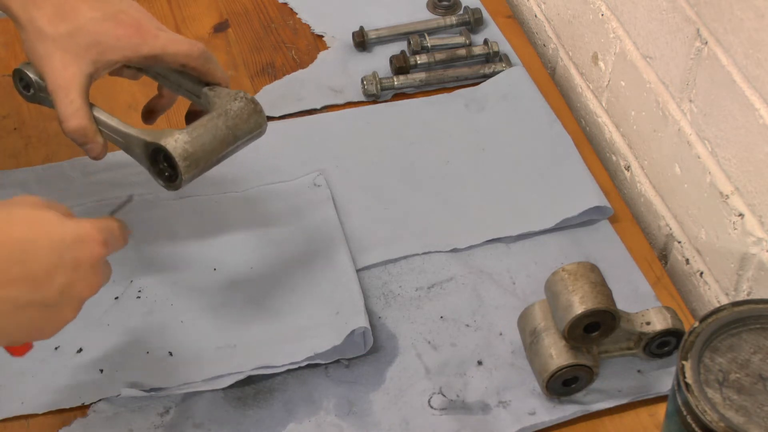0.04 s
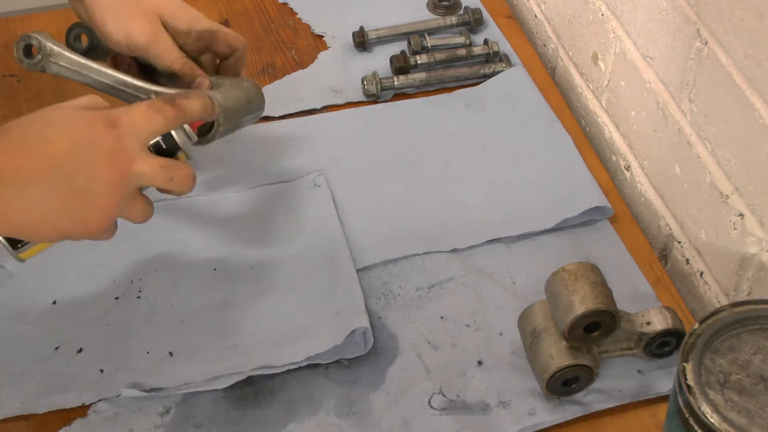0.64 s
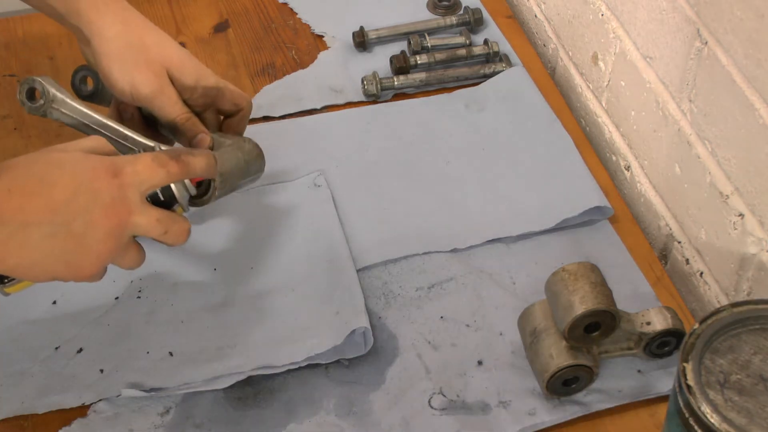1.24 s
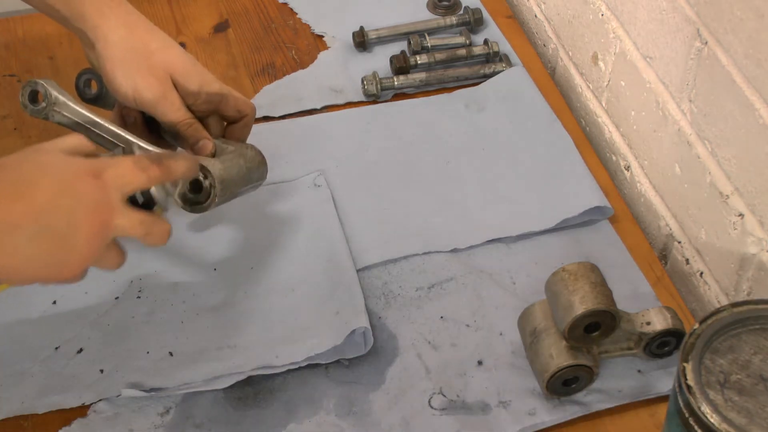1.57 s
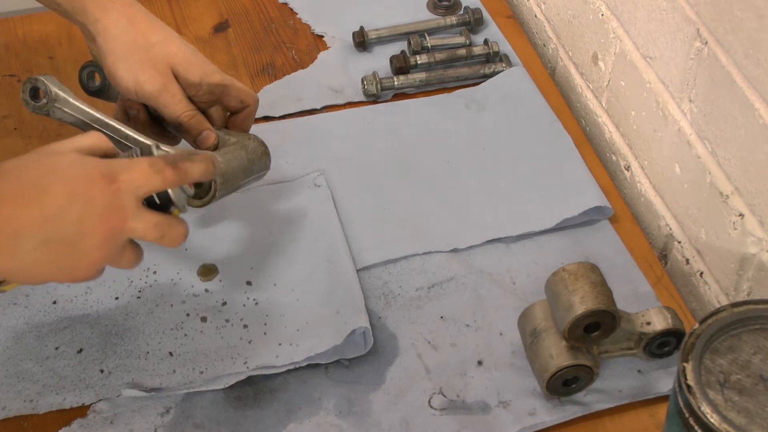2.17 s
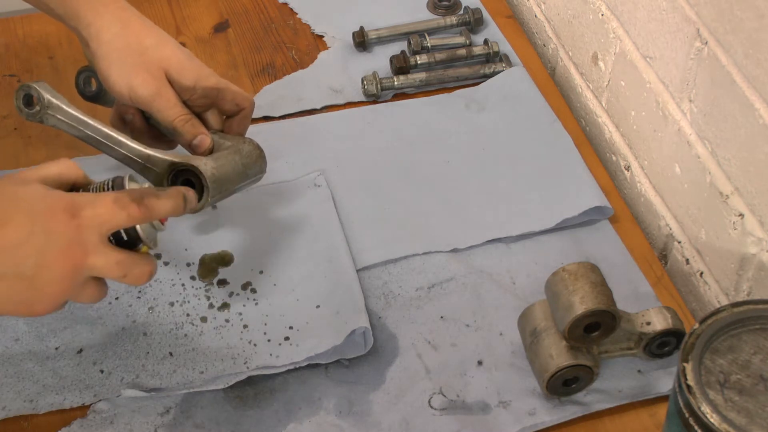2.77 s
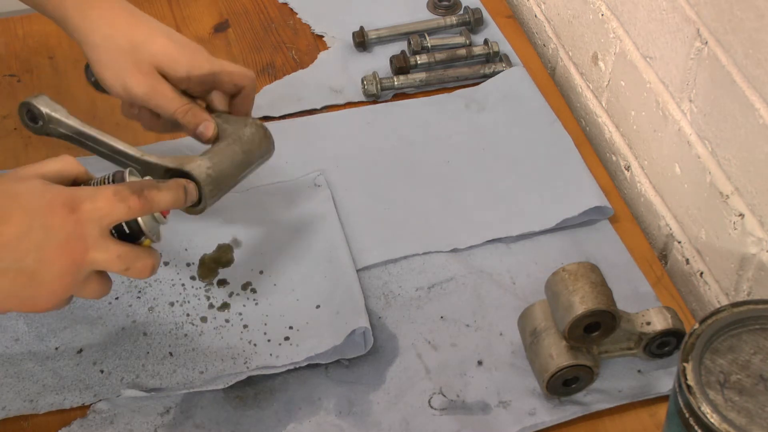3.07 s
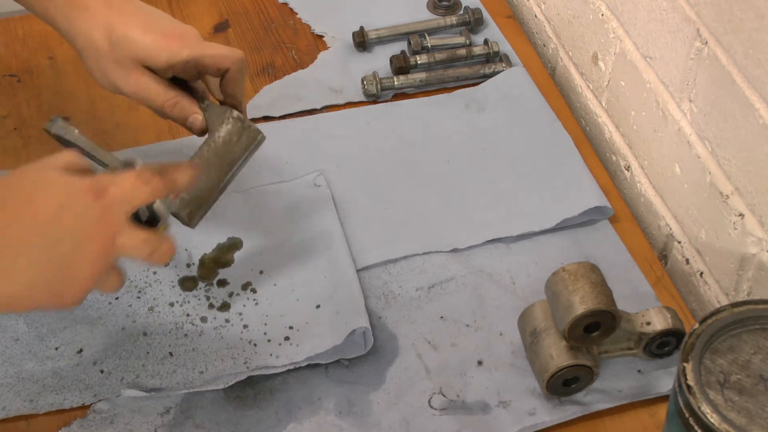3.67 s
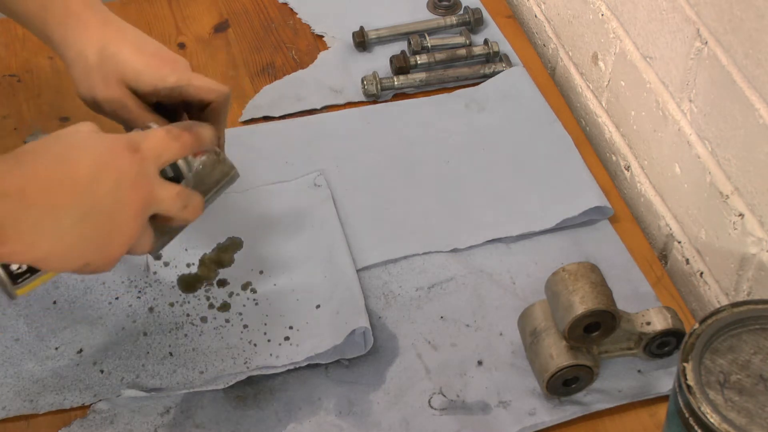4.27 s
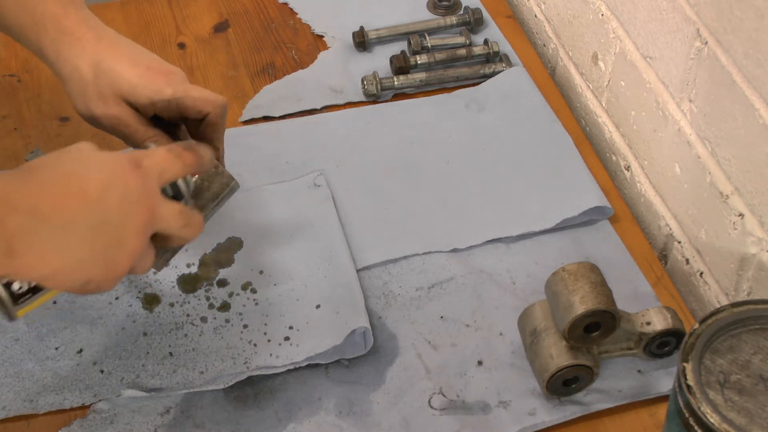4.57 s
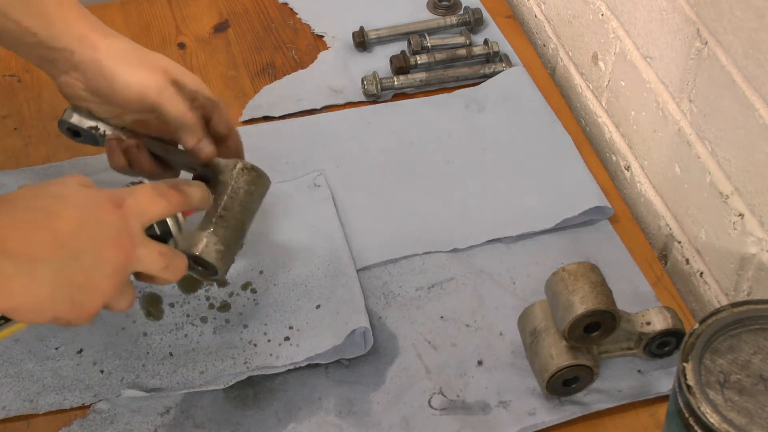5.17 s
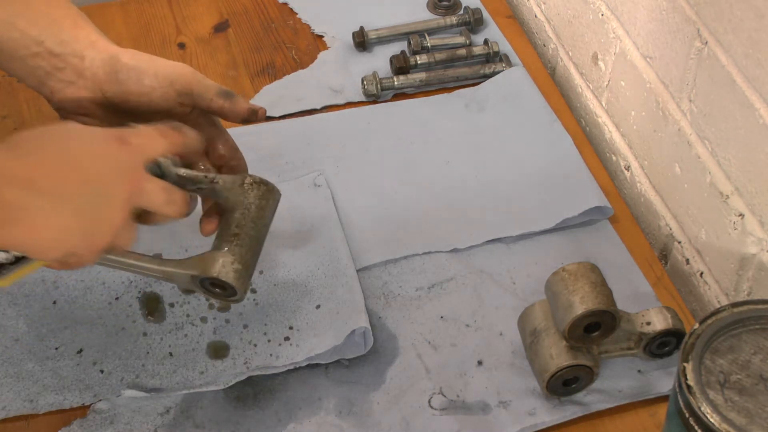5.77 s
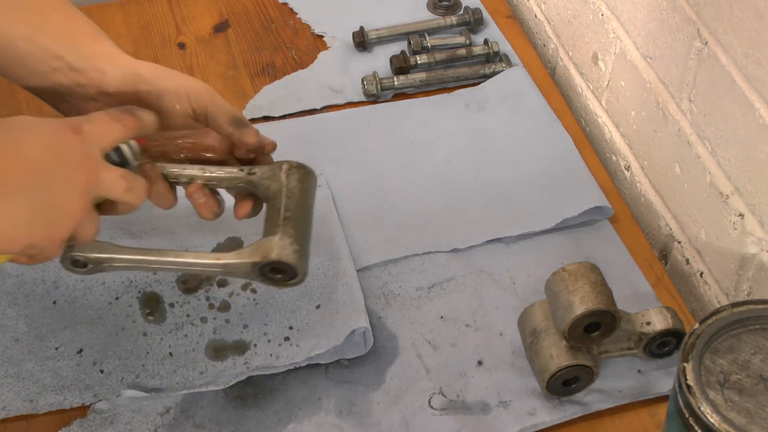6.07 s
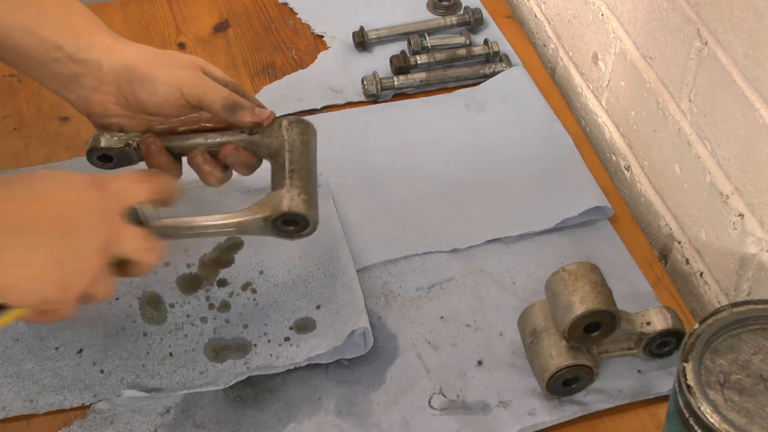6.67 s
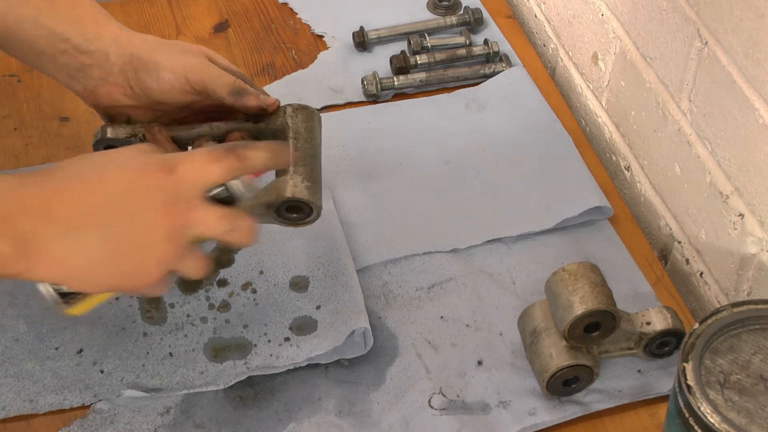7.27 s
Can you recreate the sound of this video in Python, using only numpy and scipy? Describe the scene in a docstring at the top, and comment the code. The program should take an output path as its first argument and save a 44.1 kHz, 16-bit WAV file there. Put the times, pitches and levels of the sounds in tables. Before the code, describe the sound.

An aerosol can sprays a metal part in four longer hissing bursts, then three quick puffs, over a low workshop hum.

```python
"""A light tick on metal comes first, over a workshop's fan and low hum; fingers rub an aluminium linkage.
Aerosol degreaser then hits the part, over a paper-covered bench, in four long and three short bursts.
In each the valve cracks open with a thin whistle and a wet trickle; then the turbulent jet hisses,
spatters on the metal and excites the cavity resonances of the bore and the cupped hand.
The solvent bubbles away after every burst, and the room answers with a short reverberation."""
import sys
import numpy as np
from scipy import signal
from scipy.fft import rfft, irfft, next_fast_len
from scipy.io import wavfile
from scipy.ndimage import map_coordinates

SR = 44100
rng = np.random.default_rng(int(sys.argv[2]) if len(sys.argv) > 2 else 0)


def transcribe(u):
    """Save the signal u as a 16-bit wav file named by the first command-line argument.

    u: samples, shape (n,) or (channels, n), limited to [-1, 1]; the rate is SR.
    q: integer samples, one column per channel.
    """
    v = np.clip(np.atleast_2d(u).T, -1, 1)
    q = np.round(v * 32767).astype(np.int16)
    wavfile.write(sys.argv[1], SR, q)


N = 327663


def amp(db):
    """Amplitude ratio of a level in decibels."""
    return 10 ** (np.asarray(db) / 20)


def unit(x):
    """Normalisation to rms 1."""
    return x / np.sqrt(np.mean(x ** 2) + 1e-20)


def along(points, hz):
    """Interpolation of (f, value) points on a logarithmic frequency axis."""
    f, v = np.transpose(points)
    return np.interp(np.log(hz + 1), np.log(f), v)


def wobble(rate, size):
    """Slow random modulation: a spline through rate knots a second."""
    knots = rng.standard_normal(int(size * rate / SR) + 4)
    return map_coordinates(knots, [np.arange(size) * rate / SR])


def filtered(x, response):
    """Linear filtering: the spectrum of x times a frequency response."""
    n = x.shape[-1]
    m = next_fast_len(n + 8192)
    return irfft(rfft(x, m) * response(np.fft.rfftfreq(m, 1 / SR)), m)[..., :n]


def noise(response, size):
    """Spectrally shaped Gaussian noise of rms 1."""
    return unit(filtered(rng.standard_normal(size), response))


def peak(f, hz, half_width):
    """Lorentzian resonance curve."""
    return 1 / (1 + ((f - hz) / half_width) ** 2)


def add(track, s, sound):
    """Superposition of a sound on the track from time s."""
    part = track[max(round(s * SR), 0):][:len(sound)]
    part += sound[:len(part)]


def tone(hz, waver_db, drift_rad):
    """A sinusoid under random amplitude and phase modulation."""
    t = np.arange(N) / SR
    return amp(waver_db * wobble(8.1, N)) * unit(np.sin(2 * np.pi * hz * t + drift_rad * wobble(6, N)))


# Touches of pick and fingers: t/s, level/dB, centre f/Hz, bandwidth/Hz, T60/s
TOUCHES = [(0, -51, 5240, 5000, 0.15), (0, -55.5, 2190, 700, 0.1), (.553, -59.5, 5500, 6000, 0.12),
           (3.027, -63, 8050, 1800, 0.055), (3.056, -73, 3900, 2960, .06), (7.225, -68, 2360, 400, 0.097),
           (7.251, -49.5, 2520, 506, 0.056), (7.361, -56.5, 6500, 5000, 0.13),
           (7.389, -55, 2150, 700, 0.049), (7.39, -60.5, 6500, 5000, 0.073)]
def ticks():
    """Impact excitation: the metal's vibration decays exponentially, damped by the hand."""
    out, t = np.zeros(N), np.arange(SR // 4) / SR
    attack = 1 - np.exp(-t / 0.0022)
    for s, db, hz, width, t60 in TOUCHES:
        add(out, s, amp(db - 60 * t / t60) * attack * noise(lambda f: peak(f, hz, width / 2), len(t)))
    return out


# Spectra of the room's rumble and hiss: f/Hz, relative level/dB
RUMBLE_SPECTRUM = [(25, -29), (45, -8.5), (60, -1.5), (85, 2), (150, 1), (200, -2), (232, -4.5), (290, -5),
                   (380, -13.5), (500, -10.5), (640, -17), (800, -15.5), (920, -21.5), (1250, -24.5),
                   (1800, -33.5)]
HISS_SPECTRUM = [(600, -9.5), (1000, -12), (1350, -5), (1550, 0), (1800, 2.5), (2600, 1.5), (5000, -1),
                 (8000, -5.5), (15800, -36)]
def room_noise(rumble_db=-59, hiss_db=-70):
    """Partial coherence: each ear receives a common noise plus one of its own."""
    def pair(spectrum):
        shape = lambda f: amp(along(spectrum, f))
        return unit(noise(shape, N) + noise(shape, (2, N)))
    return amp(rumble_db) * pair(RUMBLE_SPECTRUM) + amp(hiss_db) * pair(HISS_SPECTRUM)


# Air resonances of the fan housing: f/Hz, bandwidth/Hz, level/dB
HOUSING_MODES = [(435, 12, -82), (527, 110, -77.5), (856, 15, -104), (1408, 28, -81.5), (1753, 140, -80.5)]
# Blade tone and its octave: f/Hz, level/dB
BLADE_TONES = [(420.5, -76.5), (844.5, -74)]
def fan():
    """Periodic blade passage gives tones; broadband flow noise excites the housing's resonances."""
    housing = lambda f: sum(amp(db) * unit(peak(f, hz, width / 2)) for hz, width, db in HOUSING_MODES)
    airflow = filtered(rng.standard_normal(N), housing)
    return airflow + sum(amp(db) * tone(hz, waver_db=0.8, drift_rad=0.75) for hz, db in BLADE_TONES)


# Envelope of the low hum: t/s, level/dB
HUM_ENVELOPE = [(0.0, -71), (0.29, -74), (3.62, -79), (4.32, -63.5), (5.98, -65), (6.21, -53.5),
                (6.66, -64), (7.33, -56.5), (7.43, -71)]
def hum(hz=75.0):
    """Harmonic pair: a wavering fundamental and its weaker octave share one envelope."""
    envelope = amp(np.interp(np.arange(N) / SR, *np.transpose(HUM_ENVELOPE)))
    fundamental = tone(hz, waver_db=4.0, drift_rad=0.49)
    octave = amp(-12.5) * tone(2 * hz, waver_db=2.5, drift_rad=4.3)
    return envelope * (fundamental + octave)


def drone(hz=272, rest_db=-72.5, swell_db=12.5, crest_s=2.76, rise_s=0.16, fall_s=.8):
    """Narrow-band noise is heard as a soft pitch; it swells once."""
    swell = np.interp(np.arange(N) / SR, [crest_s - rise_s, crest_s, crest_s + fall_s], [0, 1, 0])
    return amp(rest_db + swell_db * swell) * noise(lambda f: peak(f, hz, 22), N)


# Reverberation time of the workshop: f/Hz, T60/s
DECAY_TIMES = [(200, 0.42), (2000, 0.32), (5000, 0.25), (9000, 0.2), (15000, 0.083)]
def workshop(x, direct_db=2.0, wet_db=-4.5, size=16384):
    """Reverberation by convolution; a fresh diffuse tail per block stands for the moving can and hands."""
    wet, window = np.zeros((2, N)), signal.windows.hann(size, sym=False)
    padded = np.pad(x, (size // 2, size))
    for i in range(0, N + size // 2, size // 2):
        hz, t, diffuse = signal.stft(rng.standard_normal((2, SR // 3)), SR, nperseg=256)
        decay = amp(-60 * t / along(DECAY_TIMES, hz)[:, None])
        tail = signal.istft(diffuse * decay, SR, nperseg=256)[1]
        block = padded[i:i + size] * window
        answer = signal.fftconvolve(block[None], tail / np.linalg.norm(tail[0]), axes=1)
        for ear in range(2):
            add(wet[ear], (i - size // 2) / SR + .004, answer[ear, max(size // 2 - i, 0):])
    return amp(direct_db) * x + amp(wet_db) * wet


# Slow slides of the fingers: t/s, duration/s, level/dB, bright resonance re dull/dB
SLIDES = [(.55, 0.78, -80, -12), (3.661, 0.58, -72, -5)]
def rubbing(dull_hz=1850, bright_hz=4520, width_hz=490):
    """Friction noise: skin sliding on the metal faintly excites two resonances of its bore."""
    out = np.zeros(N)
    for s, length, db, bright_db in SLIDES:
        n = int(length * SR)
        bore = lambda f: peak(f, dull_hz, width_hz / 2) + amp(bright_db) * peak(f, bright_hz, width_hz / 2)
        add(out, s, amp(db) * signal.windows.tukey(n, .4) * noise(bore, n))
    return out


def whistle(length, hz, width, db, bend=0, taper=.6, settle_s=0.026):
    """A breathy flow tone: narrow-band noise on a carrier that may start sharp and settle."""
    t = np.arange(int(length * SR)) / SR
    phase = 2 * np.pi * np.cumsum(hz * (1 + bend * np.exp(-t / settle_s))) / SR
    a, b = noise(lambda f: peak(f, 0, width / 2), (2, len(t)))
    return amp(db) * signal.windows.tukey(len(t), taper) * unit(a * np.sin(phase) + b * np.cos(phase))


def droplets(response, size, clump_db):
    """Intermittent turbulence: shaped noise whose strength jumps from droplet to droplet."""
    return unit(filtered(rng.standard_normal(size) * amp(clump_db * wobble(2500, size)), response))


# Resonances of the bore and the cupped hand: f/Hz, half-width/Hz, relative level/dB
CAVITY_MODES = [(1796, 130, -10), (1843, 150, -6.5), (2224, 235, -2), (2464, 180, -1), (2800, 180, -6.5)]
def cavity_resonance(n, wander_db=1.8):
    """Noise-driven air resonances trade strength as the jet moves."""
    out = np.zeros(n)
    for hz, half_width, db in CAVITY_MODES:
        strength = amp(db + wander_db * wobble(12.75, n))
        out += strength * filtered(rng.standard_normal(n), lambda f: peak(f, hz, half_width))
    return unit(out)


def near_echoes(x, strength, sway_s=.00007, count=6):
    """Comb filtering by reflections from bench, wall and part; the delays drift as the hands move."""
    i, out = np.arange(len(x)), x.copy()
    for delay in np.geomspace(.0007, .006, count) * np.exp(0.147 * rng.standard_normal(count)):
        lag = SR * (delay + sway_s * wobble(4.3, len(x)))
        out += strength * np.interp(i - lag, i, x, left=0)
    return out / np.sqrt(1 + count * strength ** 2)


# Spectrum of drops landing on the part: f/Hz, relative level/dB
SPATTER_SPECTRUM = [(120, -24.5), (230, -8.5), (310, -1.5), (400, -10.5), (510, 2), (640, -1.5), (800, -8),
                    (1000, -7.5), (1200, -6), (1600, -3), (2200, -20.5)]
def nozzle_flow(start, stop, level, mix_db, spectrum, open_s, shut_s, gain_db, sputter_db, echo,
                fizz_hz=8200, body_hz=2900, flutter_db=0.96, usual_flow_db=-33):
    """Atomisation: a harder flow has a larger share of fine mist, and less of spatter and cavity tone."""
    t = np.arange(start - .08, stop + .09, 1 / SR)
    n = len(t)
    flow_db = np.interp(t, *np.transpose(level))
    excess_db = flow_db - usual_flow_db
    fizz_db, spatter_db, cavity_db = mix_db
    shape = lambda f: amp(along(spectrum, f))
    fine = lambda f: 1 / (1 + (fizz_hz / (f + 1)) ** 10)
    coarse = lambda f: (1 - fine(f)) / (1 + (body_hz / (f + 1)) ** 6)
    jet = amp(-2.5) * droplets(lambda f: shape(f) * np.sqrt(coarse(f)), n, clump_db=2.0)
    fizz = droplets(lambda f: shape(f) * np.sqrt(fine(f)), n, clump_db=1.5)
    fizz *= amp(fizz_db + 0.42 * excess_db + sputter_db * wobble(31.2, n))
    spatter = droplets(lambda f: amp(along(SPATTER_SPECTRUM, f)) * peak(f, 0, 5000), n, clump_db=1.5)
    spatter *= amp(spatter_db - 0.54 * excess_db)
    cavity = cavity_resonance(n) * amp(cavity_db - 0.26 * excess_db - 2.0)
    cavity /= 1 + np.exp((start - t) / 0.018)  # the bore takes time to fill
    valve = np.exp(-np.maximum(start - t, 0) / open_s - np.maximum(t - stop, 0) / shut_s)
    flow = valve * amp(flow_db + gain_db + flutter_db * wobble(70.3, n))
    return t[0], near_echoes(flow * (jet + fizz + spatter + cavity), strength=echo)


# Spectra of the half-open valve's wet stream and of the full jet: f/Hz, relative level/dB
TRICKLE_SPECTRUM = [(1200, -17.5), (1800, 7), (2500, 5.5), (3150, -2), (3900, 1), (4250, 1.5), (4650, 2),
                    (5300, 1.5), (5900, -0.5), (7100, -3.5), (8600, -9), (10000, -8.5), (11800, -14),
                    (12500, -18.5), (15800, -28.5)]
JET_SPECTRUM = [(760, -38), (1300, -5), (1540, -22.5), (1850, -4.5), (2060, -10), (2460, 1), (3000, -5),
                (3400, -0.5), (3980, -2.5), (4560, -0.5), (7840, -3.5), (8710, -5.5), (9470, -5),
                (13900, -16), (15800, -24.5)]
def press(crack, trickle, full, shut, level, mix_db, whistle_hz, whistle_db, width_hz, bend=0):
    """Flow through a widening orifice: a two-tone whistle, a sputtering trickle, then the full jet."""
    out = np.zeros(N)
    for ratio, db in (1, 0), (1.33, -9.5):
        add(out, crack, whistle(0.079, ratio * whistle_hz, width_hz, whistle_db + db, bend, taper=.5))
    trickle_mix_db = np.add(mix_db, (0.5, -2, -2))  # fizz, spatter, cavity
    add(out, *nozzle_flow(trickle, full - .006, level, trickle_mix_db, TRICKLE_SPECTRUM,
                          open_s=0.0148, shut_s=0.0036, gain_db=-0.8, sputter_db=2, echo=0.27))
    add(out, *nozzle_flow(full, shut, level, mix_db, JET_SPECTRUM,
                          open_s=0.0048, shut_s=0.014, gain_db=-0.7, sputter_db=1.46, echo=0.21))
    return out


# Long presses: crack t/s, trickle t/s, fully open t/s, shut t/s, whistle f/Hz, whistle level/dB,
# fraction by which the whistle starts sharp, relative level/dB of fizz, of spatter and of cavity
LONG_PRESSES = [(1.142, 1.189, 1.449, 1.767, 6000, -58, .4, -3.5, -21.5, -6.5),
                (2.056, 2.083, 2.134, 2.56, 6140, -50.5, 0, -3, -18, -5.5),
                (4.089, 4.16, 4.397, 4.901, 5820, -55.5, 0.02, -4.5, -19.5, -7.5),
                (5.301, 5.364, 5.55, 5.855, 5500, -57.5, 0.049, -5, -17.5, -6)]
# Flow under the finger, one curve per long press: t/s, level/dB
FLOW_CURVES = [
    [(1.19, -44), (1.254, -35.5), (1.364, -46), (1.494, -33.5), (1.512, -27), (1.64, -29), (1.654, -30),
     (1.74, -37.5)],
    [(2.085, -47), (2.111, -44.5), (2.159, -36), (2.273, -31), (2.307, -28), (2.379, -28.5), (2.431, -34.5),
     (2.467, -33), (2.477, -29.5), (2.557, -28.5), (2.565, -31)],
    [(4.16, -44), (4.372, -47.5), (4.402, -36.5), (4.574, -33.5), (4.9, -35.5)],
    [(5.362, -44.5), (5.41, -43.5), (5.42, -47.5), (5.538, -42), (5.55, -35.5), (5.598, -34), (5.646, -26),
     (5.694, -29), (5.724, -34.5), (5.742, -30), (5.855, -38.5)],
]
def long_bursts():
    """Throttling: the level of the jet noise follows the finger's pressure on the valve."""
    out = np.zeros(N)
    for (crack, trickle, full, shut, hz, db, bend, *mix_db), level in zip(LONG_PRESSES, FLOW_CURVES):
        out += press(crack, trickle, full, shut, level, mix_db, hz, db, width_hz=520, bend=bend)
    return out


# Hollow tones within the hiss, the nozzle's thin whistle in the first burst, and one brief low splash of the
# jet on the part: t/s, duration/s, f/Hz, # bandwidth/Hz, level/dB
HOLLOW_TONES = [(1.192, 0.3, 5820, 200, -51), (2.185, .039, 1870, 90, -39.5), (2.568, .046, 1920, 130, -51.5),
                (4.622, 0.078, 2400, 130, -41), (4.683, 0.18, 530, 90, -54), (5.44, 0.16, 4650, 500, -51),
                (5.58, .075, 520, 450, -50), (5.6, .14, 5540, 450, -35.5), (5.6, .07, 1704, 454, -40)]
def hollow_tones():
    """Edge and cavity tones sound as the jet crosses the part's edges and bore; the first row is the nozzle's
    own thin whistle, held through the first burst, and the one broad low row is the jet splashing straight onto
    the part."""
    out = np.zeros(N)
    for s, length, hz, width, db in HOLLOW_TONES:
        add(out, s, whistle(length, hz, width, db))
    return out


# Spectrum of solvent bubbling off the part: f/Hz, relative level/dB
BUBBLE_SPECTRUM = [(1500, -20.5), (3500, -2.5), (5500, 2.5), (8500, 0), (15800, -13.5)]
def foam(sprayed, relative_db=-32.5, life_s=.38):
    """Leaky integration: solvent gathers with every burst and bubbles away exponentially."""
    keep = np.exp(-1 / (life_s * SR))
    wetness = np.sqrt(signal.lfilter([1 - keep], [1, -keep], sprayed ** 2))
    envelope = wetness * amp(relative_db + wobble(25, N))
    return envelope * droplets(lambda f: amp(along(BUBBLE_SPECTRUM, f)), N, clump_db=3)


# Quick presses: crack t/s, fully open t/s, shut t/s, trickle level/dB, jet level/dB, relative fizz/dB
QUICK_PRESSES = [(6.064, 6.124, 6.187, -44, -31, -5), (6.484, 6.554, 6.643, -48.5, -33.5, -3.5),
                 (6.861, 6.908, 7.002, -50, -34.5, -5)]
def short_bursts(lag_s=.03, rise_s=0.012, arch_db=4, spatter_db=-17, cavity_db=-5):
    """Transient flow: each puff rises and falls in an arch, its whistle broader and so breathier."""
    out = np.zeros(N)
    for crack, full, shut, trickle_db, jet_db, fizz_db in QUICK_PRESSES:
        end_db, top_db = jet_db - arch_db / 2, jet_db + arch_db / 2
        level = [(full - rise_s, trickle_db), (full, end_db), ((full + shut) / 2, top_db), (shut, end_db)]
        out += press(crack, crack + lag_s, full, shut, level, (fizz_db, spatter_db, cavity_db),
                     whistle_hz=6100, whistle_db=-56.5, width_hz=1900)
    return out


def scene():
    """Superposition: handling and spray reverberate, over the bubbling solvent and the background."""
    sprayed = long_bursts() + hollow_tones() + short_bursts()
    background = room_noise() + fan() + hum() + drone()
    return workshop(ticks() + rubbing() + sprayed) + foam(sprayed) + background


# Stereo width of the microphone pair: f/Hz, side gain/dB
SIDE_GAIN = [(30, 5), (70, -17), (150, -8.5), (350, 0.5), (650, -2.5), (1500, 3), (2200, -1), (3500, -1.5),
             (5000, -13), (7500, -11), (9500, 1), (12000, 6), (15500, 5.5)]
# Its channel imbalance: f/Hz, left minus right level/dB
IMBALANCE = [(300, -.5), (900, 0), (1500, -0.5), (2100, 2.5), (2750, -0.5), (3200, 1), (4000, 0.5),
             (8000, 0.2), (10200, -2.5), (12200, 3), (15500, -2)]
def record(dry, limit_hz=15850):
    """Mid-side response of a band-limited microphone pair: width and balance vary with frequency."""
    mid = (dry[0] + dry[1]) / 2
    side = filtered((dry[0] - dry[1]) / 2, lambda f: amp(along(SIDE_GAIN, f)))
    response = lambda f: amp(np.outer([.5, -.5], along(IMBALANCE, f))) * (f < limit_hz)
    return filtered(np.array([mid + side, mid - side]), response)


dry = scene()
out = record(dry)
transcribe(out)
```